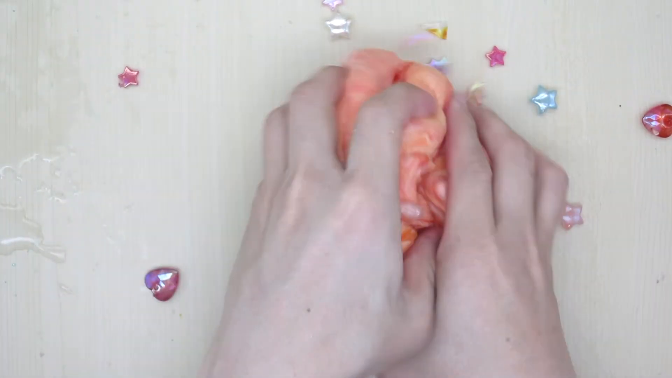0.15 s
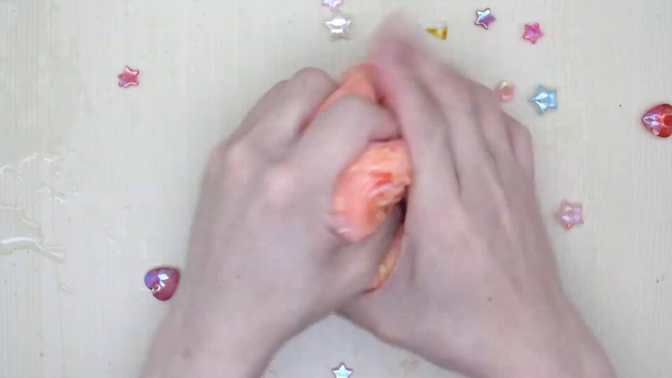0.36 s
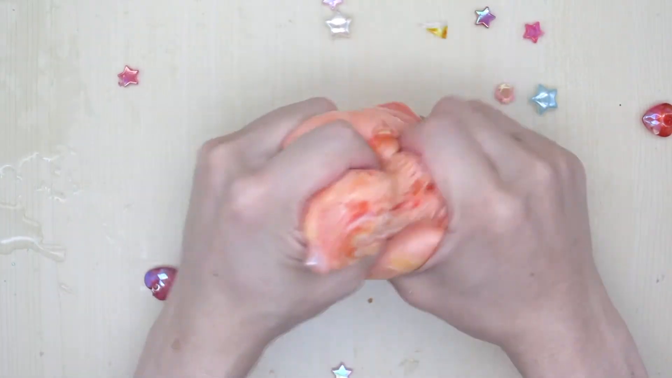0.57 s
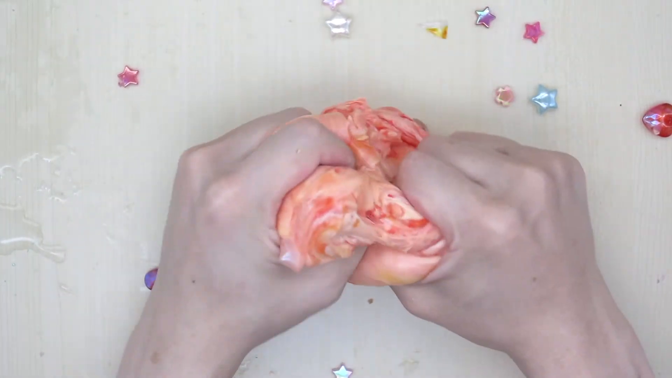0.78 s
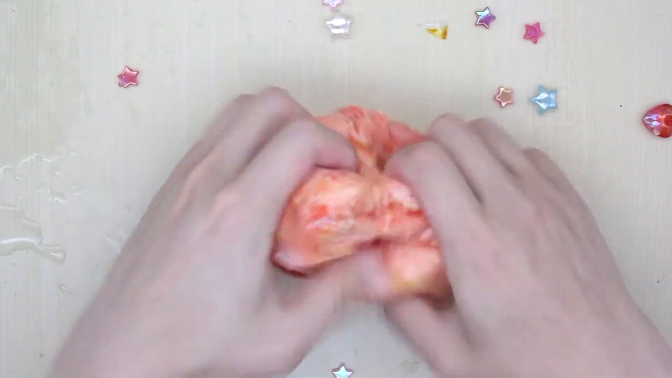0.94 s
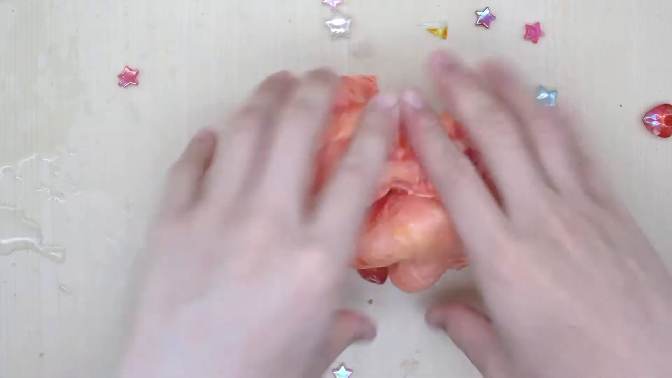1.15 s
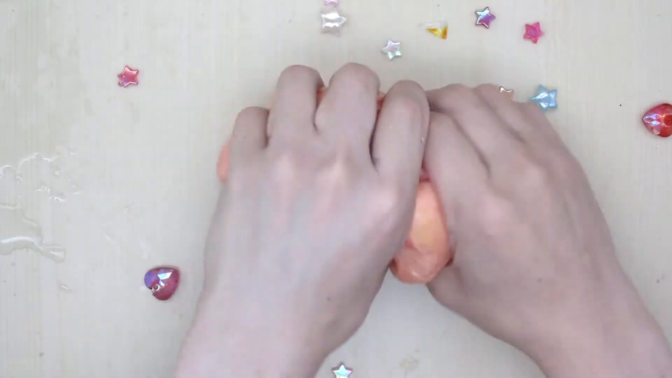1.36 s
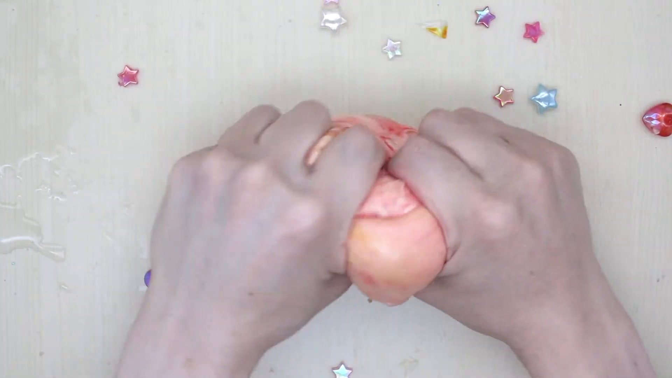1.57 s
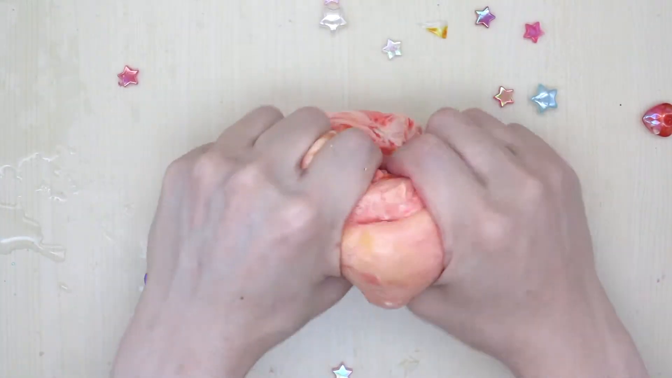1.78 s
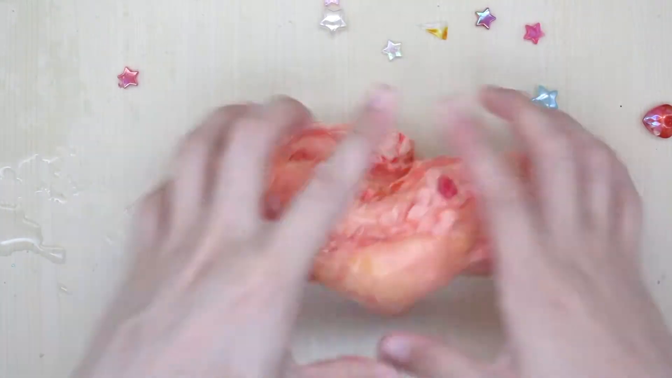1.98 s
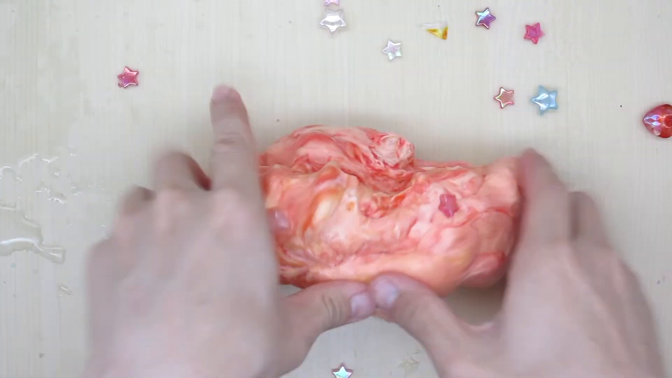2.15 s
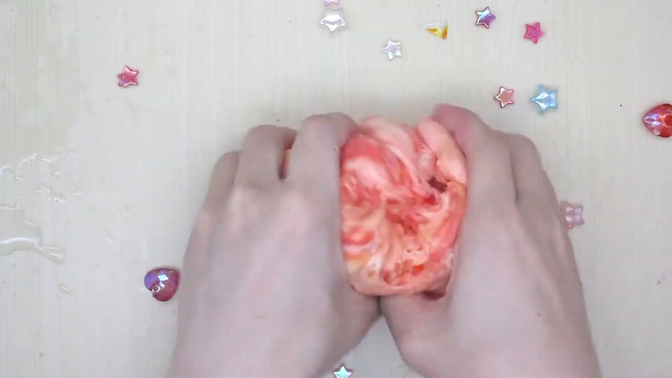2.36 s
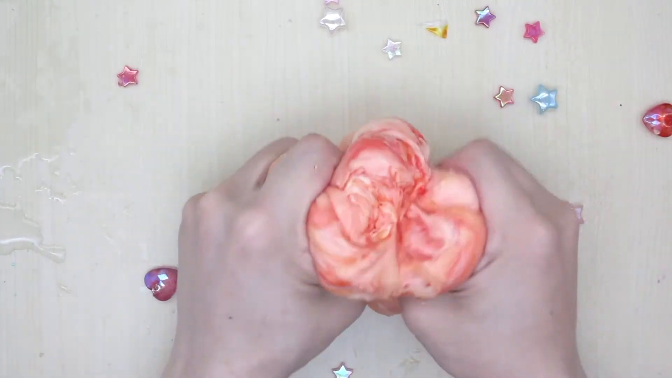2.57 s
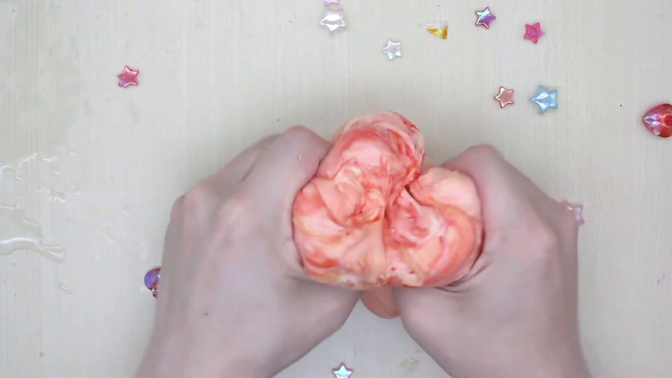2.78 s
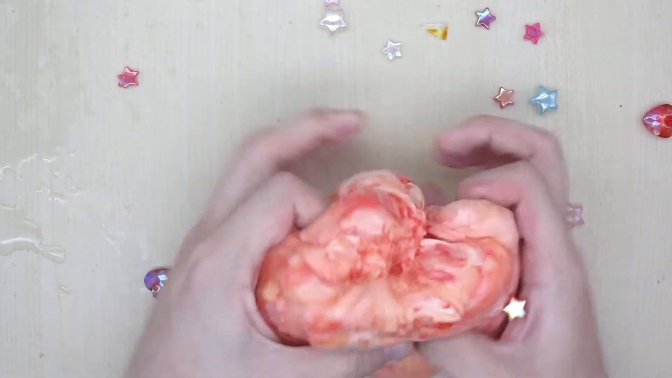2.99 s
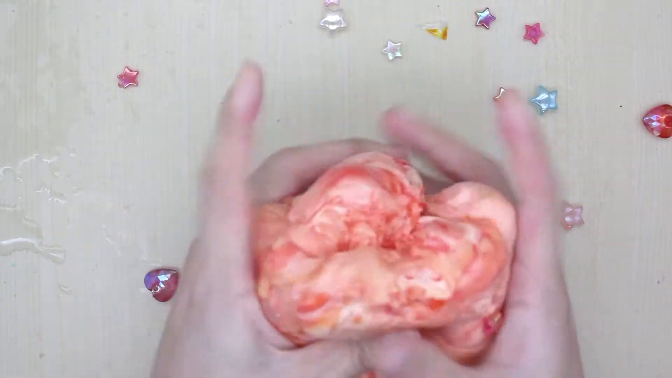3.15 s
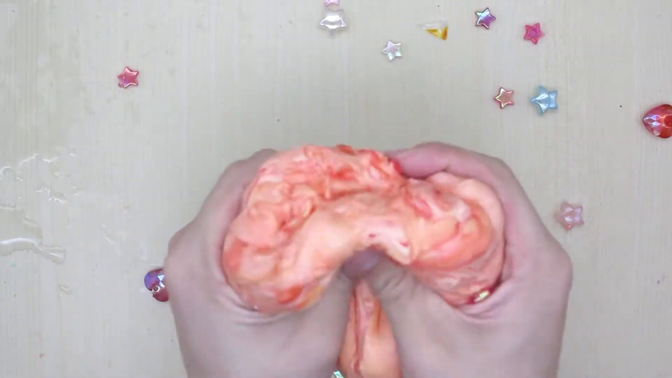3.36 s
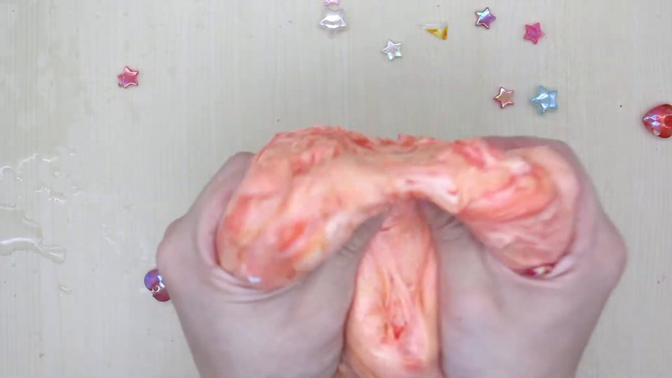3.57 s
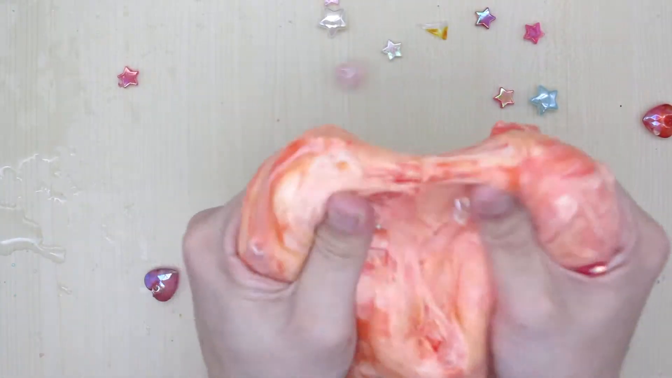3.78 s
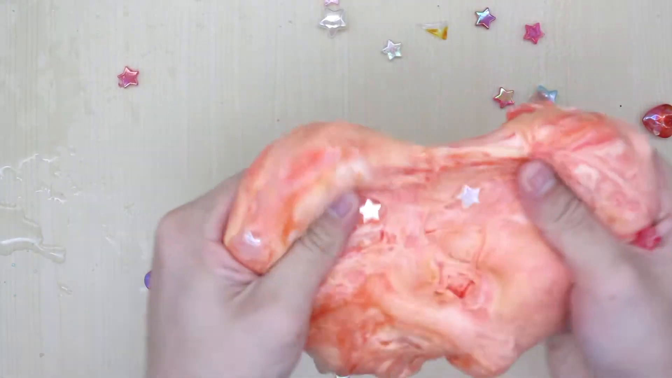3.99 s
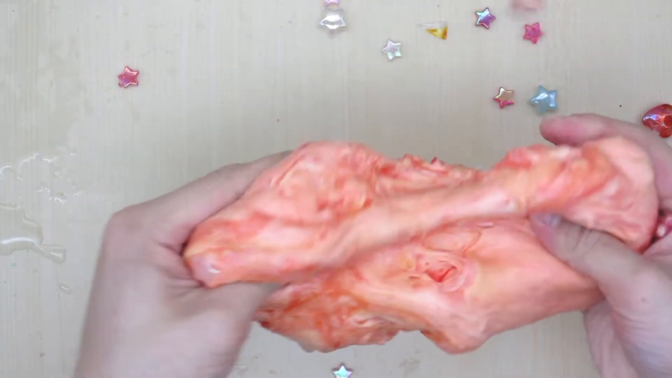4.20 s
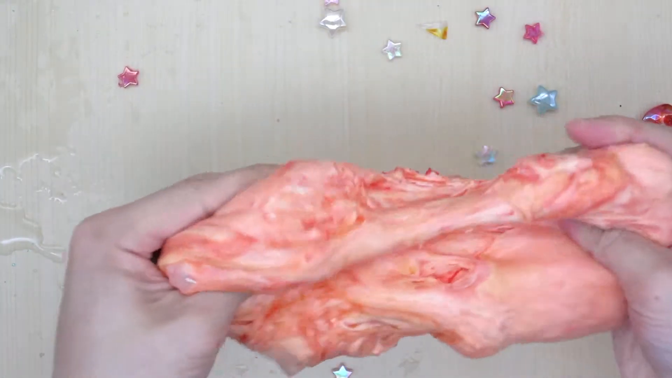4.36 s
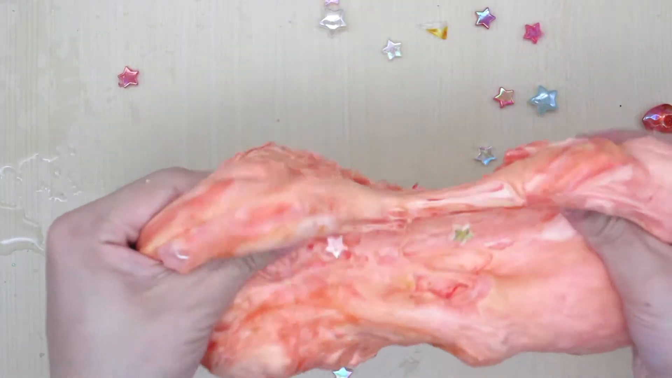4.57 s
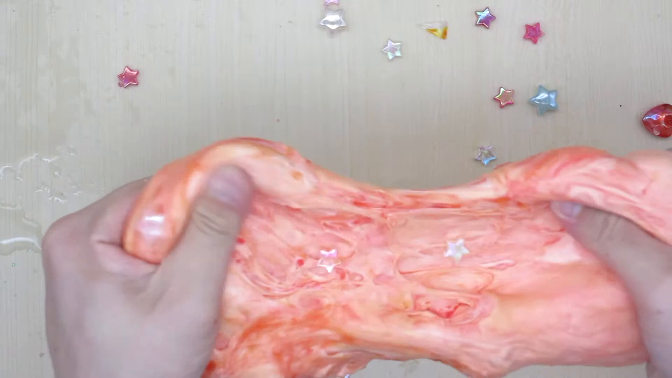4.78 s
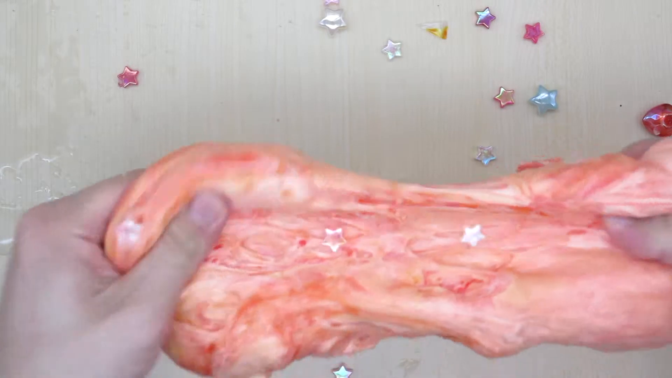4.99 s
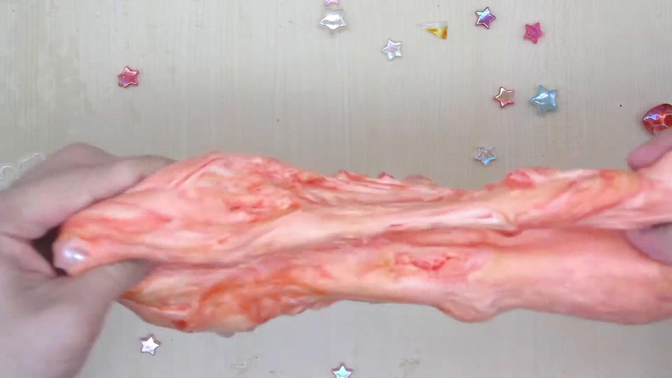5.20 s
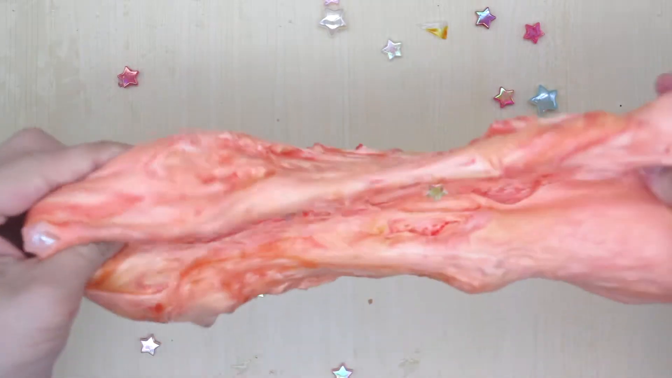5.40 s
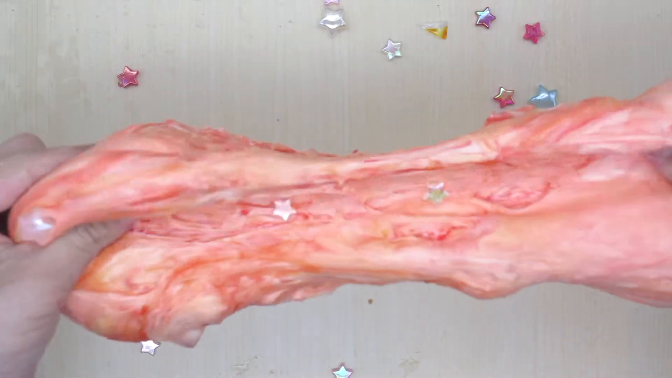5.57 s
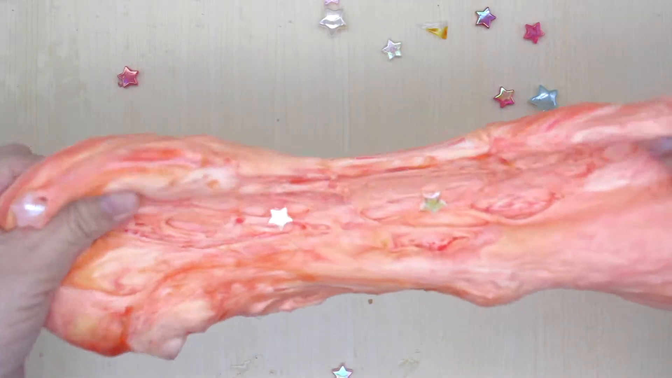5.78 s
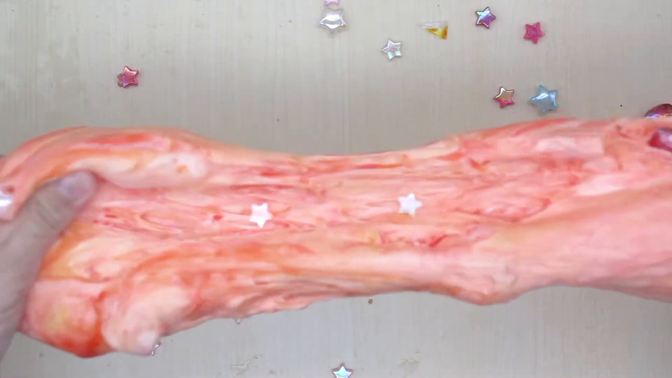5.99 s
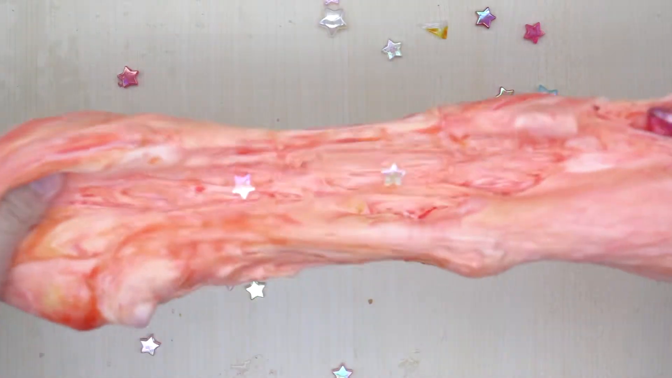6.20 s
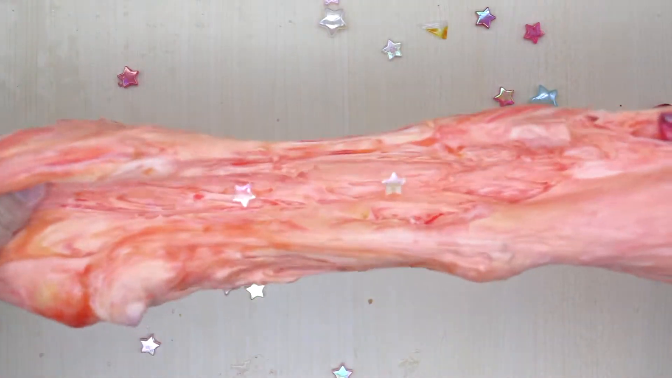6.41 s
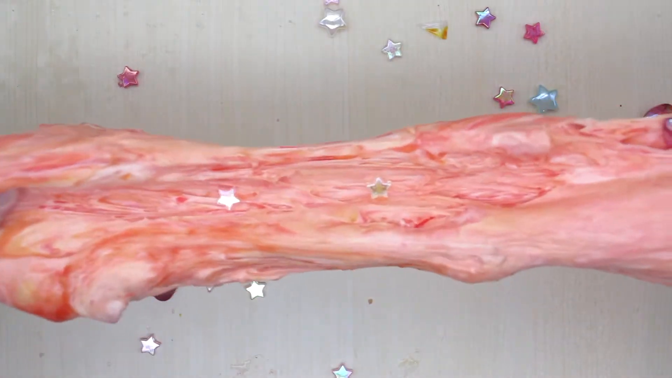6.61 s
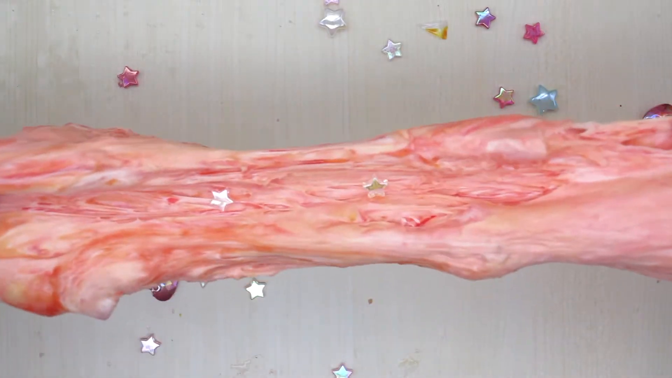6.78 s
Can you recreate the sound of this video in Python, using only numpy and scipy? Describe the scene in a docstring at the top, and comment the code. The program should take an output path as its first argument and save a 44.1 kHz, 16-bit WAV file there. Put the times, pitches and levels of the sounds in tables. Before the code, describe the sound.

Slime crackles, pops and squelches as it is squeezed on a softly thumping table, then fades to a faint fizz while being pulled.

```python
"""Kneading crunchy slime

Two hands knead and stretch a lump of slime on a table, close to the microphone. Trapped air pockets
burst and ring as cavity resonators, over a dense crackle of small bubbles and a wet squelch.
The kneading drives the table top into a low hum, and jolts excite its modes. Reflections from
nearby surfaces smear every pop over a few hundredths of a second."""
import sys
import numpy as np
from scipy import signal
from scipy.fft import rfft, irfft, next_fast_len
from scipy.io import wavfile
from scipy.ndimage import uniform_filter1d, map_coordinates

SR = 44100
rng = np.random.default_rng(int(sys.argv[2]) if len(sys.argv) > 2 else 0)


def inscribe(sig):
    """Save sig as 16-bit PCM at rate SR to the path in sys.argv[1].

    A 1-D sig is mono; a 2-D sig holds one channel per row.
    Samples are clipped to [-1, 1] before scaling.
    """
    pcm = np.round(np.clip(np.atleast_2d(sig).T, -1, 1) * 32767)
    wavfile.write(sys.argv[1], SR, pcm.astype(np.int16))


N = 302085
TIME_S = np.arange(N) / SR


def amp(db):
    """Amplitude ratio of a level in decibels."""
    return 10 ** (np.asarray(db) / 20)


def unit_rms(x):
    """Power normalisation: each row scaled to rms 1."""
    return x / np.sqrt(np.mean(x ** 2, axis=-1, keepdims=True) + 1e-20)


def contour(points):
    """Linear interpolation of (time, value) points to every sample."""
    return np.interp(TIME_S, *np.transpose(points))


def wobble(rate_hz):
    """Slow random modulation: a spline through Gaussian values."""
    return map_coordinates(rng.standard_normal(int(N * rate_hz / SR) + 4), [TIME_S * rate_hz])


def noise(spectrum, shape=(N,), centre_hz=None, octaves=1, lift_db=0):
    """Spectral shaping: coloured noise of rms 1, with an optional hump at each row's centre."""
    hz = np.fft.rfftfreq(shape[-1], 1 / SR) + 1
    knot_hz, knot_db = np.transpose(spectrum)
    gain_db = np.interp(np.log(hz), np.log(knot_hz), knot_db, left=-120, right=-120)
    if centre_hz is not None:
        gain_db = gain_db + lift_db * np.exp(-0.5 * (np.log2(hz / centre_hz) / octaves) ** 2)
    return unit_rms(irfft(rfft(rng.standard_normal(shape)) * amp(gain_db), shape[-1]))


def place(start_s, sounds):
    """Superposition: each row is added to the timeline at its start."""
    at = np.round(start_s * SR).astype(int).reshape(-1, 1) + np.arange(sounds.shape[1])
    return np.bincount(at.ravel(), sounds.ravel(), N + sounds.shape[1])[:N]


# Spectrum of room and microphone noise: frequency_hz, density_db
HISS_SPECTRUM = [(7.1, -25), (12, 2), (35, 13.5), (309, -6.5), (599, -3), (834, -6.5), (2180, -44.5),
                 (4490, -43.5), (6260, -41.5), (14500, -23.5), (15900, -28)]


def room_hiss():
    """Stationary noise: the steady floor of room and microphone."""
    return amp(-62.5) * noise(HISS_SPECTRUM)


# Vibration of the table top as the lump is pressed on it: time_s, level_db
HUM_LEVELS = [(0.0, -40), (0.17, -27), (0.266, -27), (0.472, -32), (0.689, -29), (0.77, -31), (0.842, -46),
              (0.994, -43), (1.038, -35.5), (1.225, -29), (1.3, -42), (1.36, -33), (1.385, -22.5),
              (1.648, -33.5), (1.713, -24.5), (1.861, -43), (2.028, -29), (2.09, -41), (2.24, -44),
              (2.272, -23.5), (2.404, -34), (2.56, -29.5), (2.692, -31.5), (2.755, -35), (2.831, -45),
              (2.99, -35.5), (3.292, -55)]
# Spectrum of that vibration: frequency_hz, density_db
HUM_SPECTRUM = [(7.1, -39.5), (12, 6.5), (33, -29), (59, -2), (75, -0.5), (114, -12.5), (161, -9),
                (198, -22.5), (235, -17), (300, -35.5), (390, -52.5), (660, -120)]


def table_hum():
    """Forced vibration: the top hums while the lump is worked against it."""
    pressed = TIME_S < HUM_LEVELS[-1][0]
    return amp(contour(HUM_LEVELS) + 2.3 * wobble(rate_hz=17)) * pressed * noise(HUM_SPECTRUM)


# Squeezes and tugs, with fizz and squelch relative to the level:
# full_on_s, rise_s, hold_s, fall_s, level_db, fizz_db, squelch_db
SQUEEZES = [(0.167, 0.088, 0.043, 0.095, -26, -4, -3), (0.345, 0.3, 0.015, 0.41, -30.5, -2, -6),
            (.56, 0.12, .01, .1, -33.5, -5, -2), (0.591, 0.056, 0.014, 0.27, -24.5, -4.5, -5),
            (1.037, 0.1, 0.075, 0.069, -25, -6, 1), (1.323, 0.086, 0.011, .2, -42, -8, -20),
            (1.537, .17, 0.19, 0.057, -32.5, -3, -2.5), (1.909, 0.02, 0.039, 0.21, -40, -2, 3.5),
            (2.003, 0.17, 0.065, 0.023, -31.5, -3, 1.5), (2.277, .03, .04, 0.11, -47.5, -4, -11),
            (2.36, 0.063, 0.093, 0.063, -37, -1.5, -3), (2.554, 0.207, 0.086, 0.19, -34, -3.5, -0.5),
            (2.714, 0.17, 0.047, 0.12, -51, 3.5, 0), (2.905, 0.056, .02, .1, -42.5, 0, 1),
            (3.005, 0.13, 0.0057, 0.054, -24.5, -5.5, 3.5), (3.192, .16, 0.0078, 0.028, -32.5, -1.5, -0.5),
            (3.519, .06, .02, 0.33, -38, 1, 0), (3.705, .06, 0.0066, 0.04, -33, -1.5, -6),
            (3.838, .15, .01, .1, -35.5, -2, -1), (4.15, .3, 0.0063, .2, -38.5, -3, -5),
            (4.442, .3, 0.024, 0.26, -39, -1, -0.5), (4.784, 0.069, .005, 0.075, -36.5, -2.5, -7.5),
            (5.041, .06, 0.013, 0.42, -45, -3, -5), (5.229, 0.17, .01, 0.14, -40, -3.5, -5),
            (5.461, 0.042, .005, 0.039, -44.5, 3, -19), (5.665, 0.28, .01, 0.24, -49, -2, -16),
            (5.841, 0.15, 0.0043, 0.16, -45, -0.5, -10), (5.944, 0.034, .005, 0.06, -43, -5.5, -20),
            (6.047, .07, 0.0073, 0.083, -32, 1, -9), (6.338, .2, 0.0052, .15, -57.5, 2.5, -0.5),
            (6.47, 0.12, .005, .2, -57, 0.5, -6), (6.571, 0.061, .005, 0.066, -54.5, 3, -4),
            (6.799, 0.056, .04, .1, -53.5, -1, -16)]
# Faint crackle of the lump flowing by itself: time_s, level_db
CREEP_LEVELS = [(0, -49.5), (.9, -54), (1.25, -58), (1.8, -76), (2.2, -65), (2.5, -65), (2.83, -95),
                (3.3, -55.5), (3.65, -58), (4.05, -48.5), (4.65, -53.5), (5.55, -55), (6.0, -65.5),
                (6.2, -66.5), (6.85, -68)]


def kneading():
    """Incoherent addition: squeezes and creep sum in power, giving body, fizz and squelch gains."""
    swing_db = 25  # gained over each rise, lost over each fall
    t = np.arange(0, N + 64, 64) / SR
    full_on_s, rise_s, hold_s, fall_s, level_db, fizz_db, squelch_db = np.transpose(SQUEEZES)[..., None]
    before = np.maximum(full_on_s - t, 0) / rise_s
    after = np.maximum(t - full_on_s - hold_s, 0) / fall_s
    squeeze_db = level_db - swing_db * (before + after)

    def gain(offset_db, creep_db):
        power = np.sum(amp(squeeze_db + offset_db) ** 2, axis=0)
        return np.sqrt(np.interp(TIME_S, t, power) + amp(contour(CREEP_LEVELS) + creep_db) ** 2)

    return gain(0, creep_db=0), gain(fizz_db, creep_db=-2.5), gain(squelch_db, creep_db=-3.5)


def swarm(rate_hz, spread_db, t60_s):
    """Shot noise: the envelope of randomly timed, decaying bursts of unequal size; rms near 1."""
    onsets = rng.random(N) < rate_hz / SR
    sizes = onsets * amp(spread_db * np.minimum(rng.exponential(size=N), 4))
    t = np.arange(SR // 10) / SR
    power = signal.fftconvolve(sizes ** 2, amp(-60 * t / t60_s) ** 2)[:N]
    power = np.abs(power) + 0.28 * np.mean(power)
    return np.sqrt(power / uniform_filter1d(power, SR // 6))


def bubbles(count, low_hz, high_hz, cycles, spread_db):
    """Damped oscillators: tiny bubbles of random pitch, each falling 60 dB over its cycles; rms 1."""
    when, pitch, size = rng.random((count, 3)).T[..., None]
    pitch_hz = low_hz * (high_hz / low_hz) ** pitch
    t = np.arange(400) / SR
    gain = amp(spread_db * np.minimum(-np.log(size), 4))
    rings = np.sin(2 * np.pi * pitch_hz * t) * amp(-60 * t * pitch_hz / cycles)
    return unit_rms(place(when * N / SR, gain * rings))


# Spectra of breaking bubbles, from the lowest band to the highest: frequency_hz, density_db
SQUELCH_SPECTRUM = [(200, -43.5), (300, -11.5), (350, 2), (461, 0), (593, 1), (679, -23.5), (756, -14),
                    (850, -21), (1100, -40)]
BODY_SPECTRUM = [(410, -29), (700, -6), (756, -5), (827, -4.5), (1160, -4), (1290, -8), (1420, -2),
                 (1740, -2.5), (2150, -4), (2510, -7), (2900, -26), (3770, -33.5), (6380, -120)]
FIZZ_SPECTRUM = [(2000, -28.5), (2700, -2.5), (3010, -4.5), (3360, -3.5), (4160, -2), (4660, -4.5),
                 (5690, -4), (7000, -6), (9000, -11.5), (12000, -28)]
SIZZLE_SPECTRUM = [(4500, -21), (7000, -10.5), (9000, -0.5), (11000, -3), (13000, -4.5), (14700, -6),
                   (15900, -8)]


def crackle():
    """Common amplitude modulation: countless small bubbles break, and their bursts drive four bands."""
    body_gain, fizz_gain, squelch_gain = kneading()
    bursts = swarm(rate_hz=200, spread_db=4.5, t60_s=0.086)
    ticks = swarm(rate_hz=160, spread_db=0.5, t60_s=0.077)
    body_noise = noise(BODY_SPECTRUM)
    body_rings = bubbles(count=2500, low_hz=988, high_hz=2410, cycles=20, spread_db=3.5)
    body = bursts * (0.77 * body_noise + 0.51 * body_rings)
    fizz_rings = bubbles(count=4000, low_hz=2890, high_hz=9000, cycles=41, spread_db=5)
    fizz = bursts ** 0.67 * (0.94 * ticks ** 0.78 * noise(FIZZ_SPECTRUM) + 0.41 * fizz_rings)
    flicker = bursts ** 0.4 * ticks ** 0.53 * swarm(rate_hz=150, spread_db=3.5, t60_s=0.046) ** 0.49
    sizzle_noise = noise(SIZZLE_SPECTRUM)
    sizzle_rings = bubbles(count=3000, low_hz=7500, high_hz=14000, cycles=90, spread_db=4.5)
    sizzle = flicker * (0.99 * sizzle_noise + 0.35 * sizzle_rings)
    squelch = amp(1.8 * wobble(rate_hz=30)) * bursts ** 0.28 * noise(SQUELCH_SPECTRUM)
    return (amp(-2.5) * body_gain * body
            + amp(-2) * fizz_gain * fizz
            + amp(-11) * fizz_gain ** 0.9 * sizzle  # the finest bubbles follow with smaller swings
            + amp(-5.5) * squelch_gain * squelch)


# Narrow resonances of the space between table and microphone: centre_hz, width_hz, lift_db
RESONANCES = [(336, 13, 1), (453, 45, 4), (613, 25, 4.5), (862, 60, -4), (1070, 37, 2.5), (1174, 14, 7),
              (1342, 32, 3.5), (1473, 55, 1.5), (1934, 76, 2.5), (2158, 60, 4), (2338, 54, 6),
              (2850, 33, 5), (3040, 50, 5), (3780, 74, 2.5), (4200, 150, -1), (5400, 200, 1.5),
              (6700, 210, 1), (6880, 39, 5), (7510, 70, 6), (8400, 50, -5.5), (9850, 140, -9.5)]


def resonant_space(sound):
    """Second-order resonances: each lifts or cuts a narrow band of the airborne sound."""
    size = next_fast_len(N + SR // 4)
    hz = np.fft.rfftfreq(size, 1 / SR)
    response = 1
    for centre_hz, width_hz, lift_db in RESONANCES:
        damping = 1j * hz * width_hz
        response += (amp(lift_db) - 1) * damping / (centre_hz ** 2 - hz ** 2 + damping)
    return irfft(rfft(sound, size) * response, size)[:N]


# Bursting air pockets: start_s, cavity_db, cavity_hz, snap_hz, snap_db, tick_db, suck_db, decay_s
POPS = [(0.041, -44.5, 1910, 3000, -43, -55, -66.5, 0.085),
        (0.133, -29.5, 1140, 10700, -40, -37, -39, 0.094), (0.182, -43, 1390, 5440, -36, -47.5, -30, 0.098),
        (0.23, -32, 2200, 2900, -30, -40, -33, 0.1), (0.278, -30, 2050, 5700, -32, -30.5, -37, 0.1),
        (0.324, -35, 1450, 4030, -36, -41.5, -53.0, 0.062), (0.33, -30, 1450, 4000, -29.5, -38, -37, 0.093),
        (0.401, -39, 2150, 2900, -47, -50.5, -47, 0.078),
        (0.502, -27.5, 1130, 4100, -31, -37.5, -32.5, 0.087),
        (0.556, -38, 1130, 2900, -35.5, -45.5, -39.0, 0.059),
        (0.587, -23, 2140, 8960, -18, -17.5, -36, 0.082),
        (0.616, -16.5, 1970, 2970, -34, -47.0, -45.5, 0.056),
        (0.644, -24.5, 1900, 3060, -34, -38.5, -44, 0.075),
        (0.689, -36.5, 1200, 6700, -24, -25.5, -23, 0.088),
        (0.725, -41.5, 2150, 3770, -33.5, -40.5, -37, 0.1),
        (0.746, -49.5, 1170, 5900, -33, -49.0, -51, 0.056),
        (0.833, -43, 1530, 2900, -40.5, -52.0, -57, 0.092), (0.927, -50.5, 1510, 3890, -49, -54, -62, 0.22),
        (1.023, -32.5, 1060, 5060, -36, -47.5, -27, 0.085),
        (1.094, -25.5, 1030, 6060, -18.5, -36.5, -41, 0.056),
        (1.121, -31, 2140, 2960, -29, -53.0, -43, 0.094),
        (1.182, -42.0, 2280, 2900, -48.5, -68.5, -54, 0.15),
        (1.208, -40.5, 2140, 2900, -64.5, -67, -46, 0.08),
        (1.251, -27, 1390, 5400, -23.5, -30.5, -37.5, 0.094),
        (1.302, -32.5, 1400, 5480, -30.5, -38, -44, 0.077), (1.322, -36, 2060, 6520, -37, -47, -65.0, 0.14),
        (1.363, -46, 2240, 2900, -50, -72.0, -63, 0.15), (1.423, -46, 2310, 2900, -49.0, -66, -62, 0.12),
        (1.465, -43, 2290, 3750, -30.5, -64, -59, 0.074),
        (1.519, -27.5, 1190, 3970, -33, -48.5, -42, 0.099), (1.551, -20, 2070, 2840, -27, -30, -24, 0.041),
        (1.575, -31.5, 2200, 3550, -26.5, -32, -49.5, 0.079),
        (1.598, -34, 2130, 2900, -34.0, -52.0, -50.0, 0.15),
        (1.643, -27.0, 2080, 3740, -44, -45, -30, 0.062), (1.666, -36, 1080, 6180, -30.5, -51, -44, 0.059),
        (1.788, -56, 1140, 8760, -52, -49, -45, 0.069), (1.856, -49, 1210, 5970, -28.5, -47, -49.5, 0.078),
        (1.882, -40, 880, 6980, -43, -52, -43, 0.11), (2.001, -35, 1140, 3770, -36, -51, -46.0, 0.12),
        (2.025, -31.5, 1130, 6790, -40, -47, -29, 0.091),
        (2.249, -44, 1580, 5440, -46, -57.5, -46.5, 0.085),
        (2.272, -39, 1600, 5480, -45, -56, -38.5, 0.091), (2.325, -48, 990, 10220, -57, -50, -30.5, 0.1),
        (2.354, -40, 2010, 7070, -48, -43, -54.5, 0.068), (2.381, -38, 2260, 2900, -49, -53.5, -35, 0.13),
        (2.449, -45, 1080, 3670, -48.5, -50, -40, 0.098),
        (2.51, -39.5, 1830, 11200, -50.5, -37.5, -47, 0.067),
        (2.556, -33.5, 1140, 6980, -44, -40, -24.5, 0.1), (2.58, -34, 1150, 7070, -43, -49, -43, 0.093),
        (2.638, -48, 1380, 6140, -36, -56.0, -28, 0.15), (2.701, -44, 1330, 6610, -34.5, -42, -56.5, 0.094),
        (2.721, -40.0, 1150, 3890, -40, -54.0, -41, 0.099), (2.932, -42, 2130, 3520, -42, -48, -37, 0.12),
        (2.958, -31.5, 2070, 4000, -37, -52.5, -44.5, 0.09),
        (2.983, -20.5, 1380, 2900, -34, -58, -42, 0.075), (3.047, -39, 1060, 2940, -51, -56, -51, 0.071),
        (3.113, -41, 1100, 3790, -40.0, -46, -31, 0.13), (3.185, -36.5, 1350, 5450, -30, -44.5, -38, 0.11),
        (3.306, -52, 2100, 3590, -58, -73, -56, 0.096), (3.344, -47.5, 1230, 4920, -53, -67, -48, 0.085),
        (3.383, -57, 1220, 7510, -58, -72.5, -48.5, 0.12),
        (3.44, -43.5, 1520, 2900, -63, -70.5, -58.0, 0.068),
        (3.477, -46.5, 2600, 8200, -44, -46, -50.5, 0.15),
        (3.502, -40.5, 2600, 2900, -31, -41, -53.5, 0.095),
        (3.523, -43.0, 2150, 6140, -30.5, -35.5, -36, 0.092),
        (3.55, -39, 2170, 7160, -36, -34.5, -58, 0.085), (3.578, -38.5, 1250, 5590, -35, -52, -54, 0.1),
        (3.646, -42.0, 2230, 2900, -39, -44.5, -53, 0.12),
        (3.688, -32.5, 2180, 5060, -31, -37.5, -57, 0.14), (3.705, -28, 2230, 5410, -30, -40.5, -17, 0.098),
        (3.73, -27.5, 2080, 2980, -32.5, -41, -29, 0.078), (3.765, -39, 1590, 5590, -36, -46, -59.0, 0.085),
        (3.791, -47, 1340, 7260, -35.0, -38, -60.0, 0.08),
        (3.807, -34.0, 1500, 6980, -47.0, -51.5, -56, 0.061),
        (3.827, -33.5, 1130, 9430, -42, -30.0, -39, 0.11), (3.856, -13, 1730, 3950, -20, -28, -20, 0.076),
        (3.871, -20.5, 1760, 3300, -26, -34, -34, 0.079),
        (3.899, -38, 1660, 7760, -55.0, -57.0, -56.0, 0.078),
        (3.948, -21.5, 1710, 6150, -31.5, -40.5, -36, 0.098),
        (3.958, -35, 1590, 4860, -40.5, -57, -44, 0.096),
        (3.976, -34, 1700, 5440, -48.0, -64.0, -43, 0.054),
        (4.009, -35, 1670, 3870, -43, -49.5, -32.5, 0.079),
        (4.084, -11, 1920, 5200, -23.0, -32.5, -22, 0.087),
        (4.138, -35.5, 1350, 2900, -49.5, -51, -37, 0.085),
        (4.149, -28.5, 1680, 4510, -42.5, -38.0, -26, 0.076),
        (4.213, -24.5, 1100, 4780, -30.5, -35, -22.5, 0.058),
        (4.236, -36.5, 1630, 10570, -41, -41, -34.5, 0.09),
        (4.251, -33, 1190, 5410, -32, -35.5, -44, 0.093), (4.278, -7, 1520, 2900, -12.5, -21.5, -15, 0.071),
        (4.303, -22, 1720, 7100, -22, -31.5, -27, 0.093),
        (4.315, -23, 1900, 6800, -32, -25.5, -42.0, 0.095),
        (4.384, -12.5, 1560, 2890, -19.5, -23, -26.0, 0.072),
        (4.389, -39.5, 1460, 2900, -37, -38.5, -34.5, 0.12),
        (4.429, -32.5, 1520, 11100, -35, -38.5, -32, 0.079),
        (4.489, -38.5, 1530, 4140, -38.5, -39.5, -39, 0.18),
        (4.509, -40.5, 1510, 3200, -40, -46.0, -48.0, 0.16),
        (4.545, -39.5, 1510, 3250, -44.0, -48, -47, 0.13),
        (4.566, -40.5, 1520, 3380, -44, -43.0, -38, 0.082),
        (4.656, -54.5, 2070, 11000, -51, -39, -61.5, 0.14), (4.708, -44, 1280, 11000, -56, -47, -49, 0.11),
        (4.937, -51.5, 940, 3640, -51, -52.5, -53, 0.11),
        (4.98, -43.5, 1080, 3630, -38.5, -49.5, -52.5, 0.062),
        (5.051, -41.0, 2070, 4890, -42.5, -45, -54.0, 0.11), (5.109, -53, 1800, 5780, -52, -48, -51, 0.13),
        (5.138, -43.5, 1760, 2980, -48, -63.0, -56, 0.1), (5.227, -44.0, 1330, 7460, -45, -49.5, -57, 0.11),
        (5.267, -53, 1190, 4760, -56.5, -59.5, -60.5, 0.07),
        (5.393, -51, 1260, 9560, -46.5, -48, -65, 0.12), (5.451, -35, 1640, 5150, -30.0, -39, -50, 0.065),
        (5.512, -69, 2600, 6980, -46.5, -50, -71, 0.14), (5.749, -54, 2000, 5800, -56, -56, -72, 0.085),
        (5.824, -44, 2210, 3120, -41.5, -49, -62.5, 0.11), (5.906, -50.5, 940, 3080, -45, -51, -60, 0.096),
        (5.938, -41.5, 1650, 9100, -40, -39, -50, 0.085), (6.042, -32.5, 1570, 3420, -30, -41, -49.0, 0.1),
        (6.291, -50, 2090, 2900, -63.5, -67.0, -76.5, 0.058),
        (6.324, -45, 1390, 2850, -46.5, -59, -54, 0.074), (6.423, -54, 1480, 7020, -49, -53, -61, 0.1),
        (6.608, -65, 2260, 9490, -54, -53, -75.0, 0.081), (6.715, -70.5, 2600, 7170, -46, -54, -65, 0.075),
        (6.777, -54, 1410, 7410, -57.5, -63.5, -77.0, 0.077),
        (6.807, -18.5, 1960, 6260, -22.5, -26.5, -28, 0.088),
        (6.812, -14.5, 1960, 6400, -20.5, -37.5, -19, 0.078)]


def pops():
    """Cavity resonance: each bursting pocket rings briefly, snaps in the treble and sucks wetly."""
    columns = np.transpose(POPS)[..., None]
    start_s, cavity_db, cavity_hz, snap_hz, snap_db, tick_db, suck_db, decay_s = columns
    t = np.arange(6000) / SR
    shape = (len(POPS), len(t))

    def envelope(rise_s, direct, tail, tail_db):
        """Double decay: direct sound and reflected tail fall 60 dB in their fractions of decay_s."""
        fall_db = -60 * t / decay_s
        return (1 - np.exp(-t / rise_s)) * (amp(fall_db / direct) + amp(tail_db + fall_db / tail))

    glide = t + 0.32 * 0.0023 * (1 - np.exp(-t / 0.0015))  # the pitch starts high and settles
    ring = 2.1 * np.sin(2 * np.pi * cavity_hz * glide)
    ring *= envelope(rise_s=0.0015, direct=0.36, tail=1, tail_db=-29.5)
    spray = 3.75 * noise(BODY_SPECTRUM, shape, cavity_hz, octaves=0.1, lift_db=8.5)
    spray *= envelope(rise_s=0.00075, direct=0.41, tail=0.8, tail_db=-2.5)
    snap = 0.93 * noise(FIZZ_SPECTRUM, shape, snap_hz, octaves=0.2, lift_db=9.5)
    snap *= envelope(rise_s=0.00049, direct=0.58, tail=0.87, tail_db=-4.5)
    tick = 1.09 * noise(SIZZLE_SPECTRUM, shape, snap_hz, octaves=0.13, lift_db=10.5)
    tick *= envelope(rise_s=0.00018, direct=0.1, tail=0.9, tail_db=-1)
    suck = 1.03 * noise(SQUELCH_SPECTRUM, shape)
    suck *= envelope(rise_s=0.0023, direct=0.68, tail=0.84, tail_db=-13)
    cavity = 0.68 * ring + 0.32 * spray
    pockets = amp(cavity_db) * cavity + amp(snap_db) * snap + amp(tick_db) * tick + amp(suck_db) * suck
    return place(start_s, pockets)


# Jolts to the table from the lump, a hand or a big pop: start_s, level_db, pitch_hz, overtone_db
THUDS = [(0.106, -21, 68, -16), (0.204, -20, 62, -28), (.602, -16.5, 82.6, -19.5), (0.678, -17, 76.6, -17),
         (.76, -20, 80, -34), (1.061, -19, 67.6, -19), (1.374, -5.5, 61.5, -30), (1.686, -16, 68.4, -29),
         (1.98, -26, 61.4, -9.5), (2.045, -20, 64, -19), (2.252, -19, 110, -26),
         (2.273, -11.5, 77.3, -17.5), (2.579, -12.5, 72.8, -15.5), (2.655, -18, 72, -20),
         (2.979, -27.5, 75.5, -15), (3.07, -29.5, 84, -13.5), (3.699, -38.5, 70, -8),
         (3.724, -23.5, 161, -50), (3.858, -17, 109, -7), (3.872, -21.5, 122, -7), (3.95, -28, 110, -9.5),
         (4.086, -18.5, 105, -3.5), (4.149, -31.5, 89, -8), (4.215, -27.5, 89, -1),
         (4.281, -8.5, 106.5, -14.5), (4.304, -16.5, 101, -6.5), (4.386, -19.5, 117, -12.5),
         (4.43, -22, 93, -16), (4.494, -25, 100, -33), (4.54, -30.5, 120, -12), (4.571, -32.5, 85, -17),
         (4.646, -36.5, 99, -25), (6.811, -16.5, 162, -15), (6.819, -23, 61, -10)]


def table_thuds():
    """Free vibration: a jolt leaves the table top ringing in two damped modes."""
    rise_cycles, t60_cycles, second_mode_hz = 0.5, 10.05, 240
    start_s, level_db, pitch_hz, overtone_db = np.transpose(THUDS)[..., None]
    t = np.arange(SR // 3) / SR
    cycles = pitch_hz * t
    glide = t + 0.5 * 0.0041 * (1 - np.exp(-t / 0.0057))  # the blow is quicker than the ring after it
    fundamental = np.sin(2 * np.pi * pitch_hz * glide)
    overtone = amp(overtone_db) * np.sin(2 * np.pi * second_mode_hz * t)
    swell = 1 - np.exp(-(cycles / rise_cycles) ** 2)
    decay = amp(level_db + 4.5 - 60 * cycles / t60_cycles)
    return place(start_s, swell * decay * (fundamental + overtone))


# Low rumble while the lump is lifted and stretched: time_s, level_db
RUMBLE_LEVELS = [(3.2, -49.5), (3.52, -50), (3.94, -39.5), (4.42, -47), (4.7, -52.5), (5.7, -55),
                 (6.03, -50), (6.15, -51), (6.54, -55.5), (6.85, -49.5)]
# Spectrum of that rumble: frequency_hz, density_db
RUMBLE_SPECTRUM = [(7.1, -32), (12, 9.5), (19, 1.5), (38, -17.5), (60, -7.5), (98, -18), (203, -18.5),
                   (300, -21.5), (390, -40.5), (660, -120)]


def stretching_rumble():
    """Modulated low-frequency noise: the table rumbles unevenly as the lump is stretched."""
    lifted = TIME_S > RUMBLE_LEVELS[0][0]
    return amp(contour(RUMBLE_LEVELS) + 2.9 * wobble(rate_hz=10)) * lifted * noise(RUMBLE_SPECTRUM)


def scene():
    """Airborne and structure-borne sound: slime through the air, table through the stand; mono."""
    airborne = amp(-1) * resonant_space(crackle() + pops())
    structure_borne = table_hum() + table_thuds() + stretching_rumble()
    return (airborne + structure_borne + room_hiss())[None]


def record(dry):
    """Saturation and band limiting: the loudest peaks are rounded and the top treble is removed."""
    rounded = dry / (1 + np.abs(dry) ** 8) ** (1 / 8)
    passband = np.fft.rfftfreq(N, 1 / SR) < 16791
    return irfft(rfft(rounded) * passband, N)


dry = scene()
out = record(dry)
inscribe(out)
```